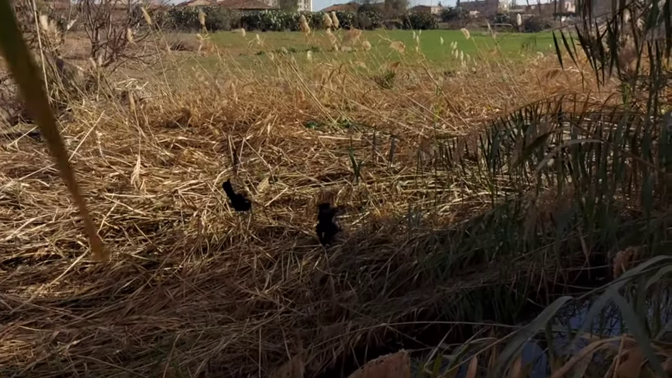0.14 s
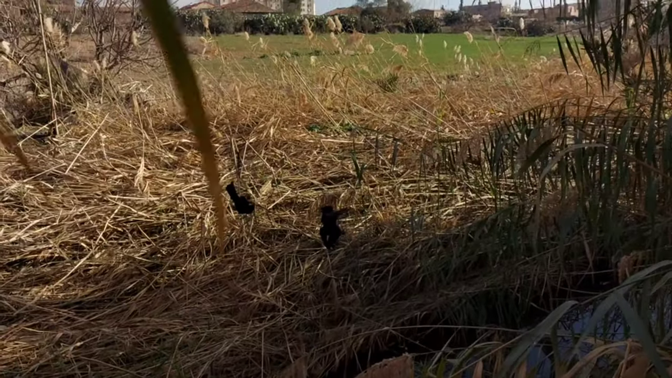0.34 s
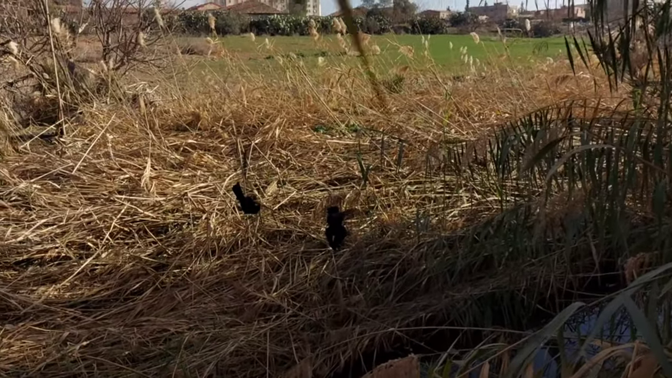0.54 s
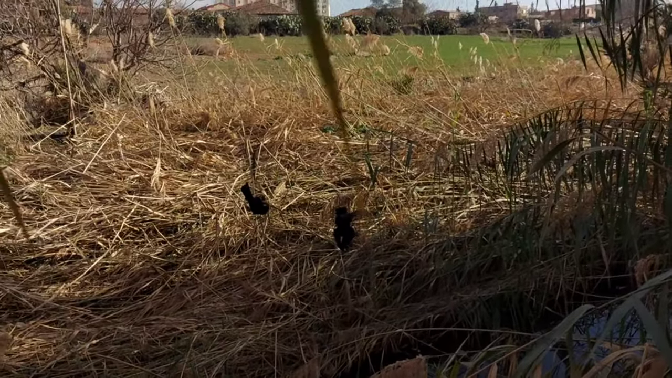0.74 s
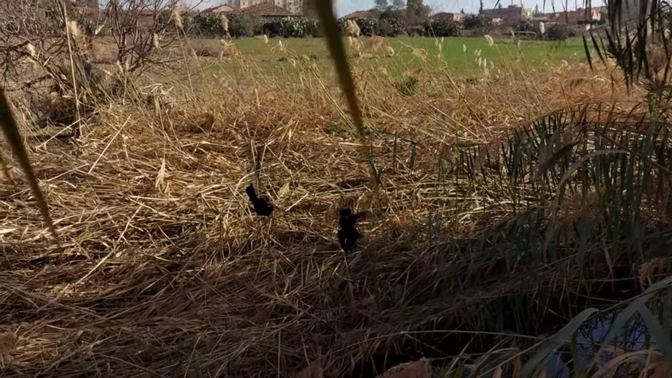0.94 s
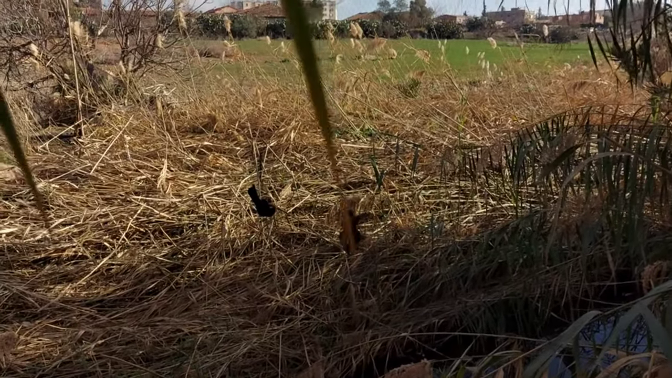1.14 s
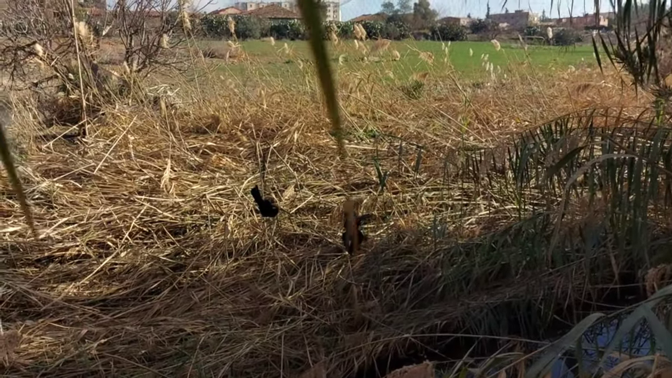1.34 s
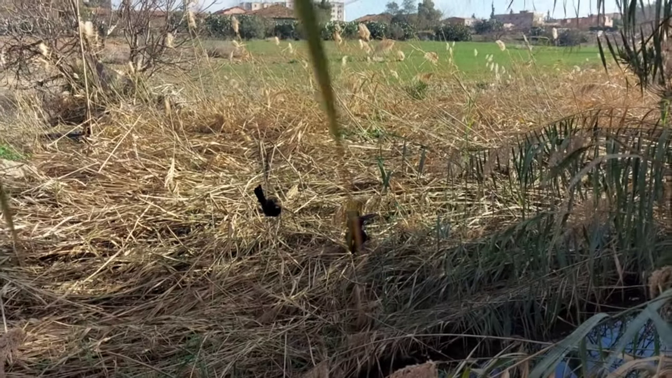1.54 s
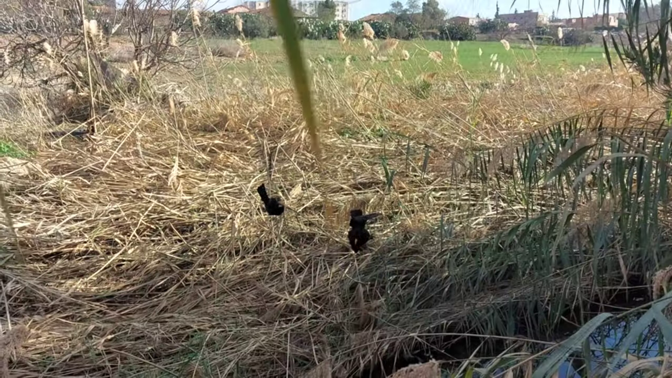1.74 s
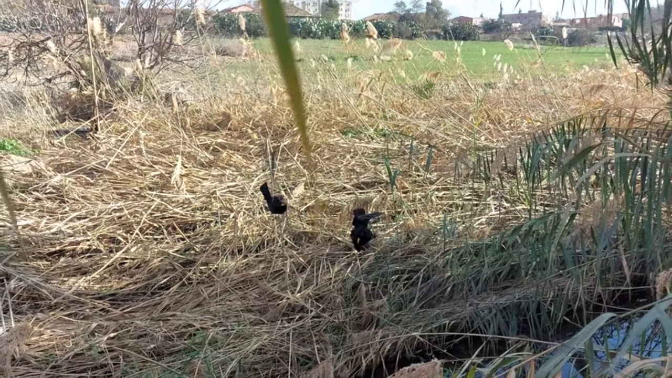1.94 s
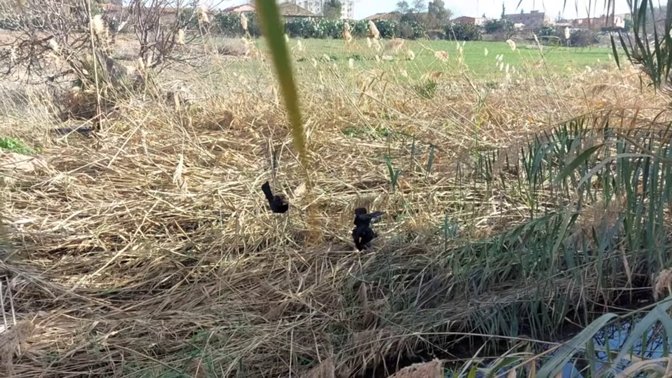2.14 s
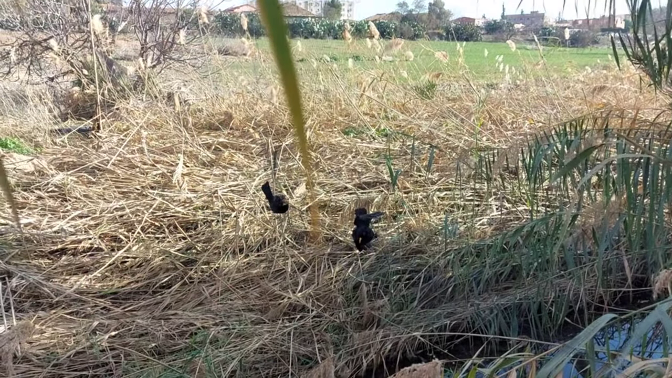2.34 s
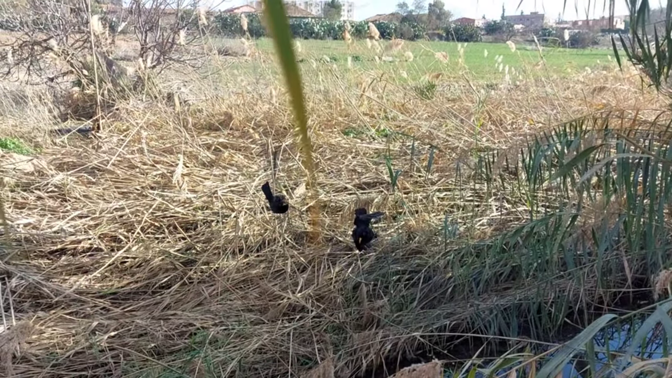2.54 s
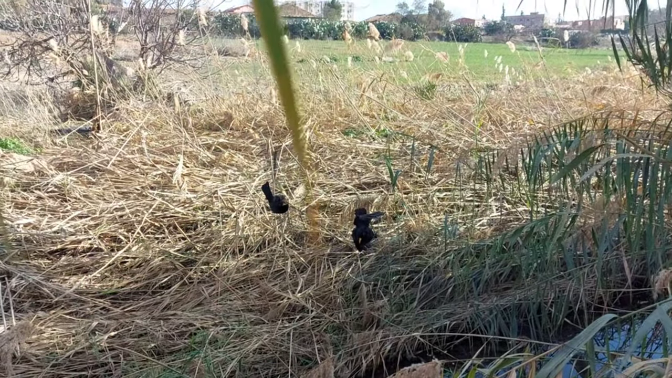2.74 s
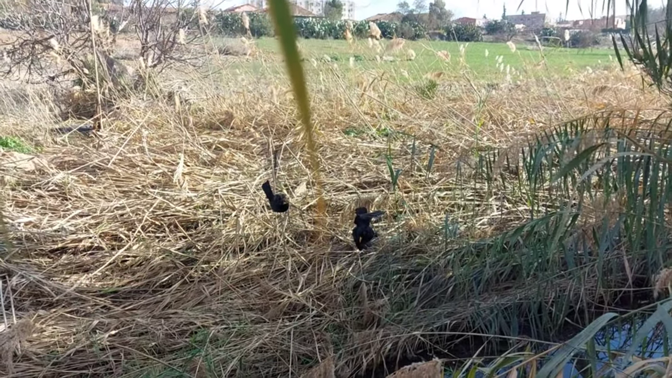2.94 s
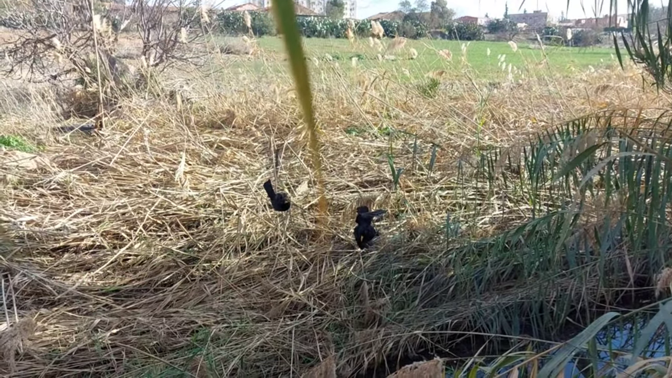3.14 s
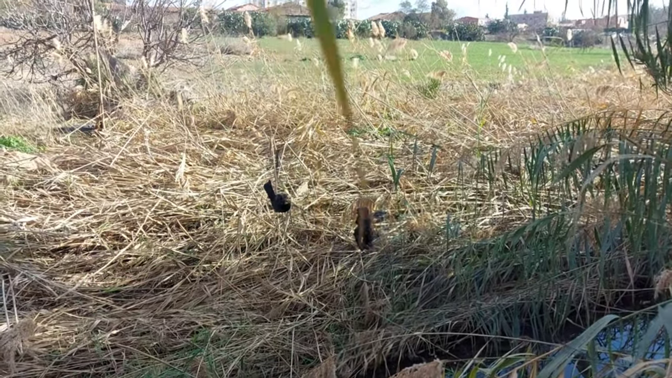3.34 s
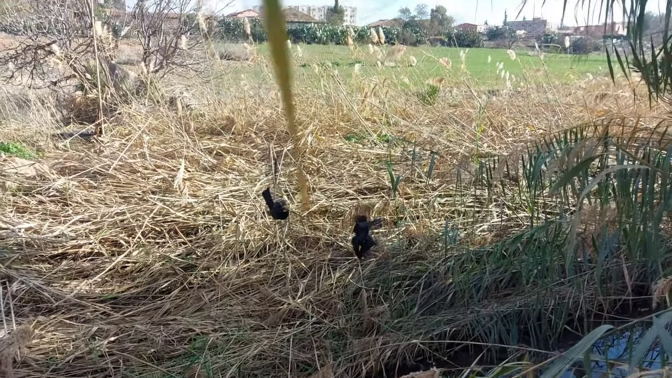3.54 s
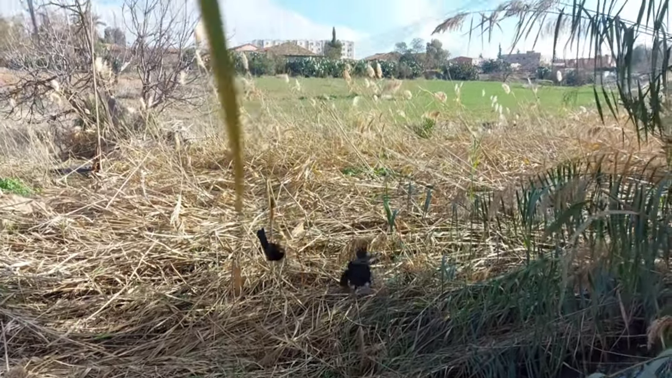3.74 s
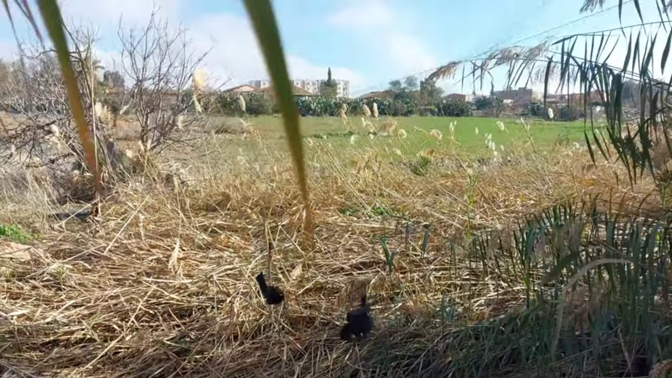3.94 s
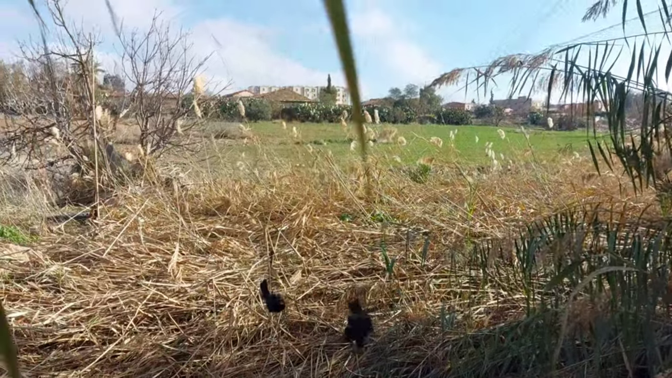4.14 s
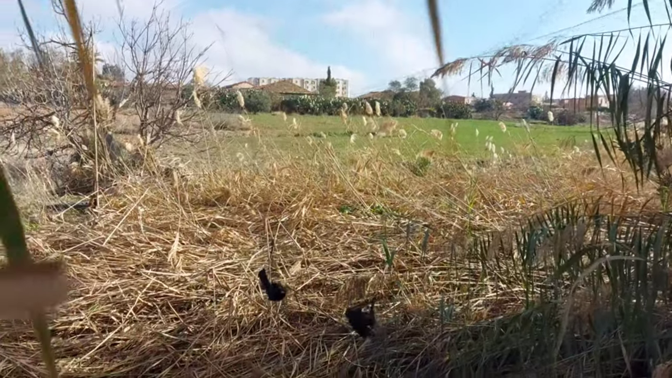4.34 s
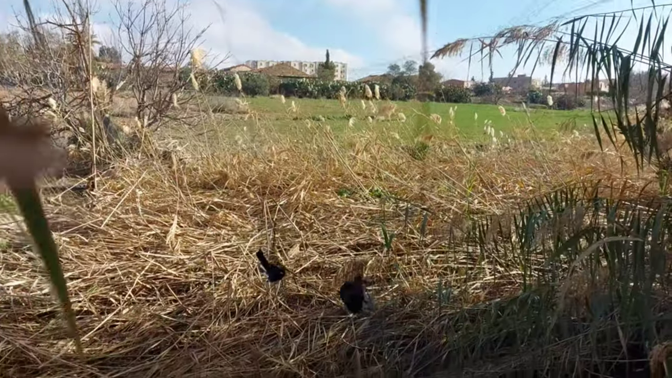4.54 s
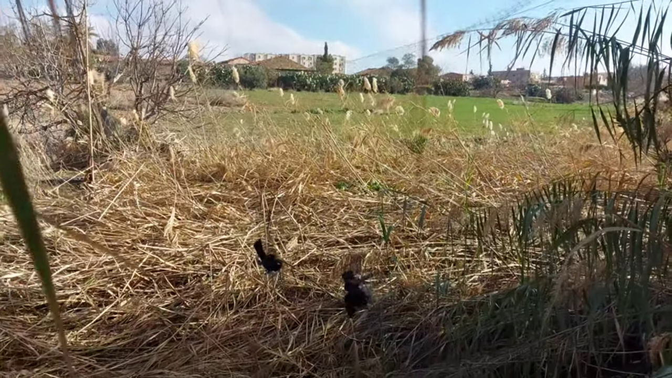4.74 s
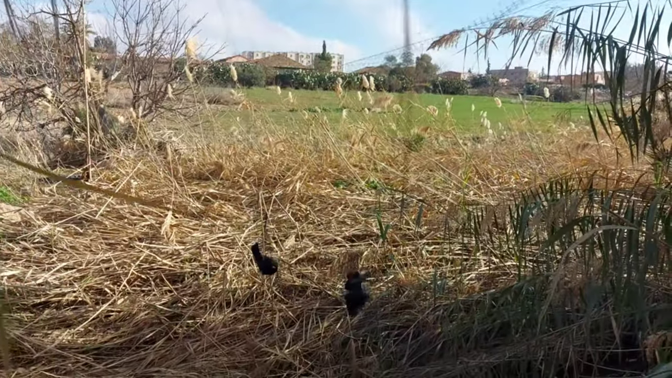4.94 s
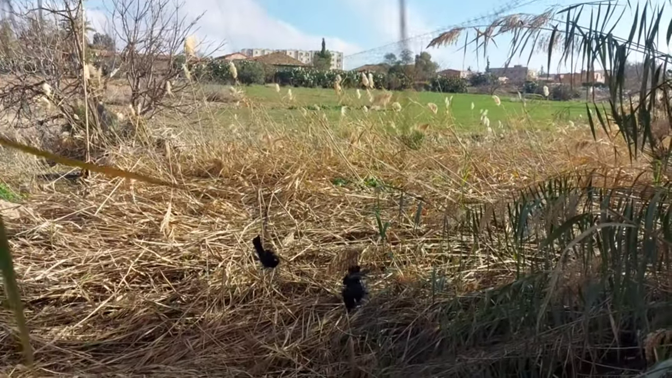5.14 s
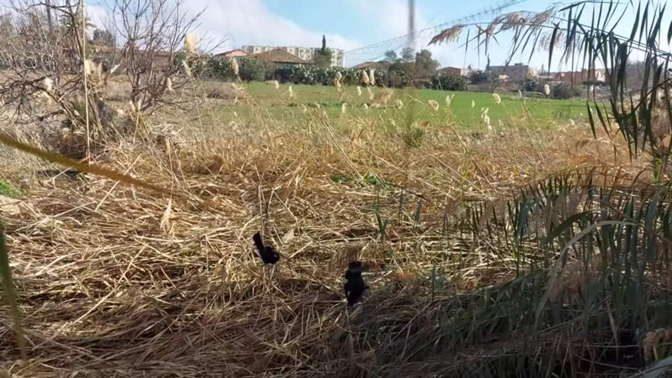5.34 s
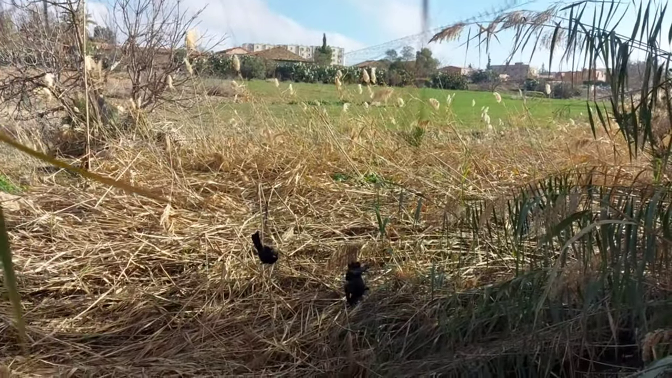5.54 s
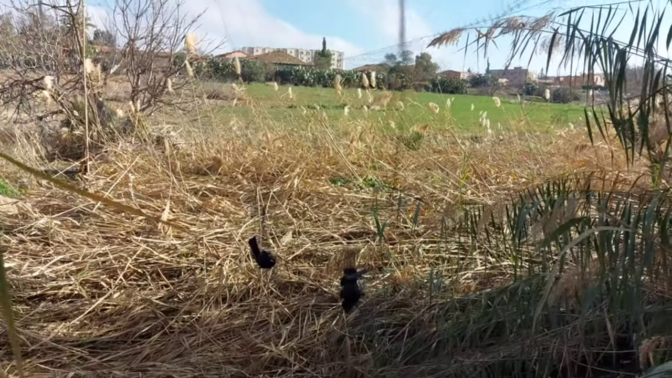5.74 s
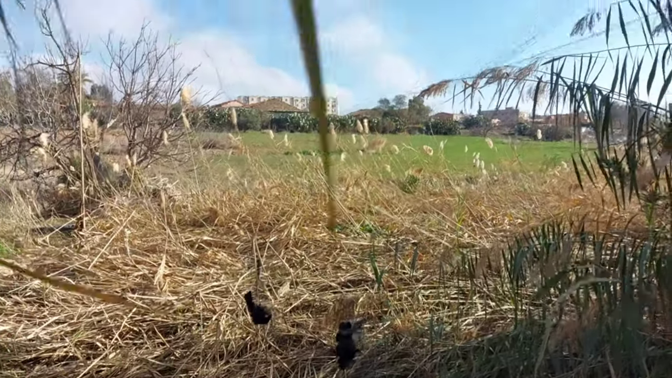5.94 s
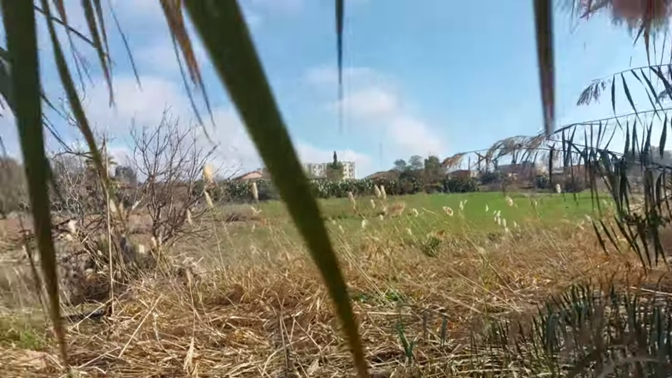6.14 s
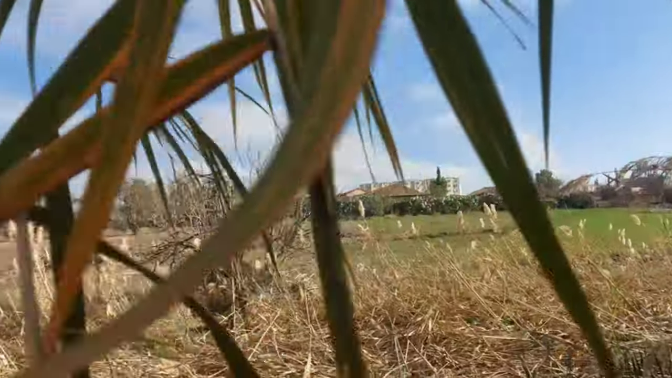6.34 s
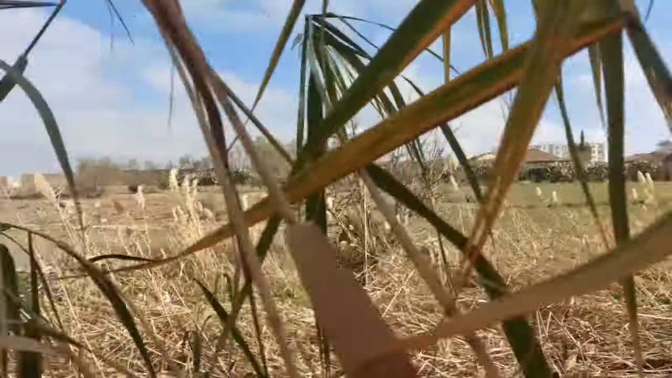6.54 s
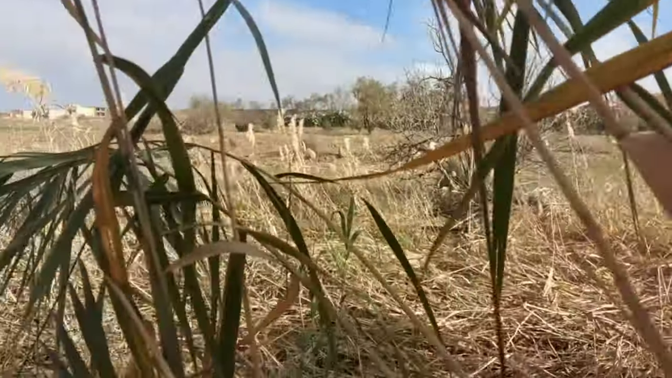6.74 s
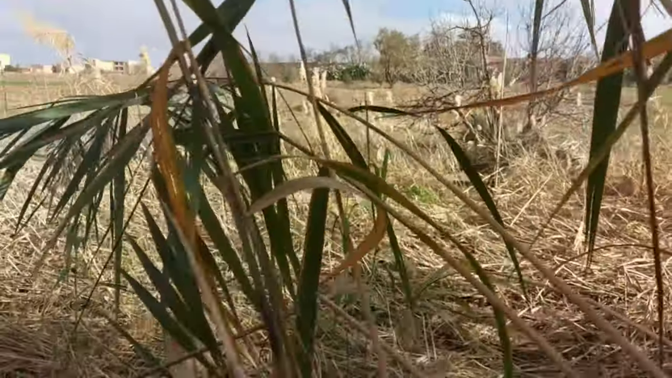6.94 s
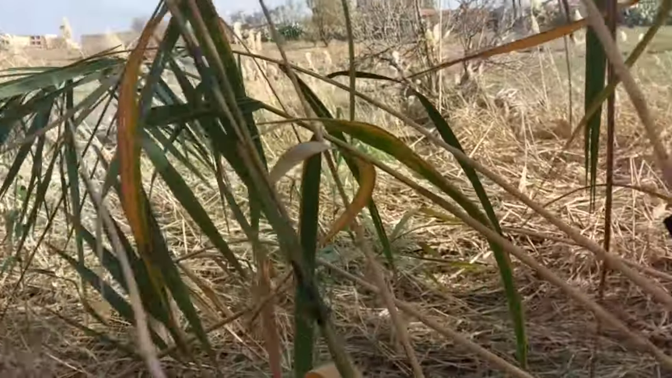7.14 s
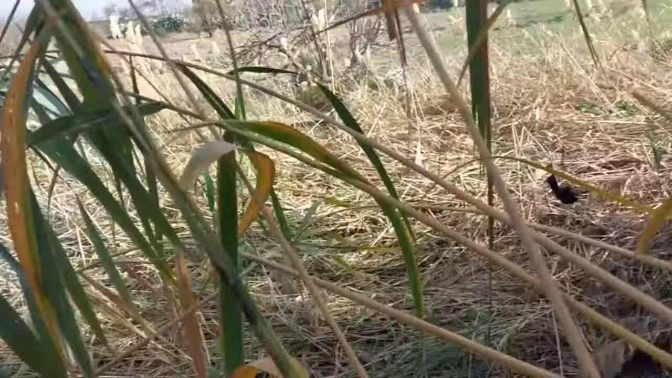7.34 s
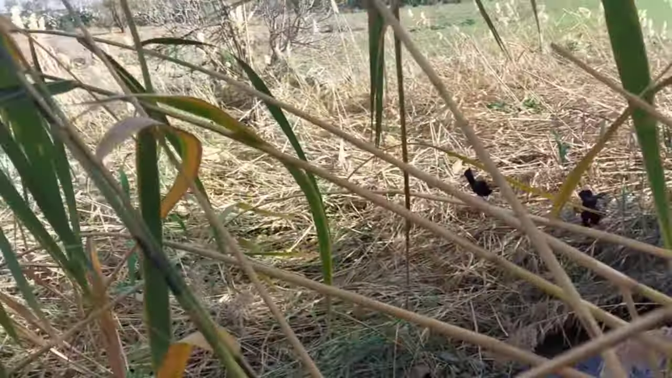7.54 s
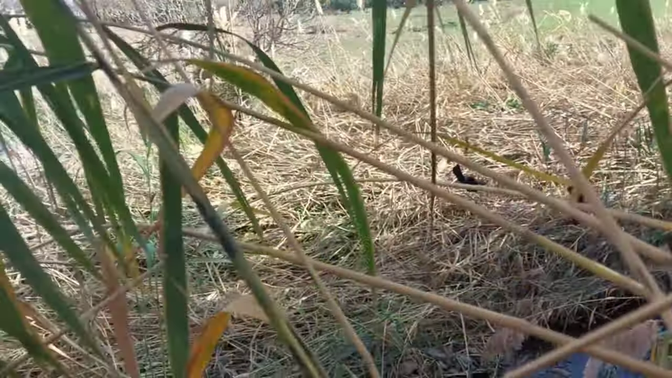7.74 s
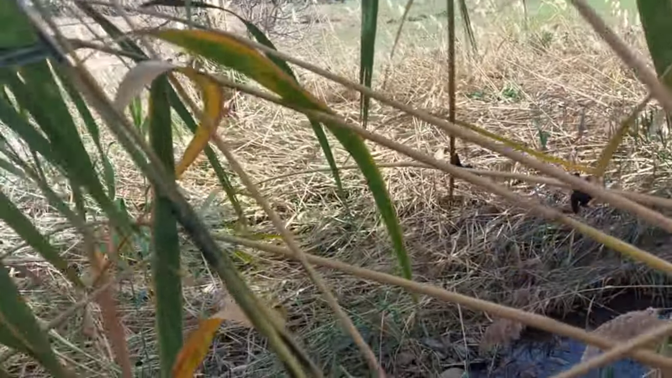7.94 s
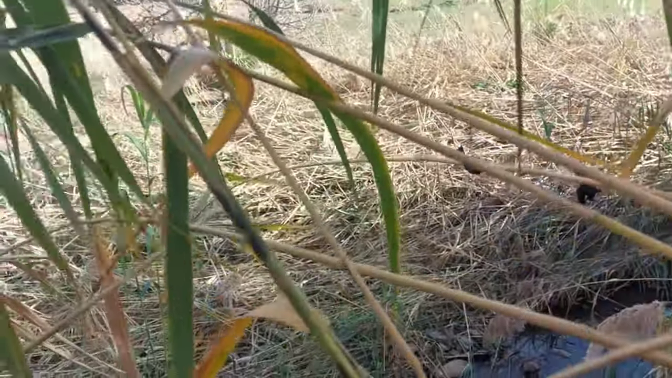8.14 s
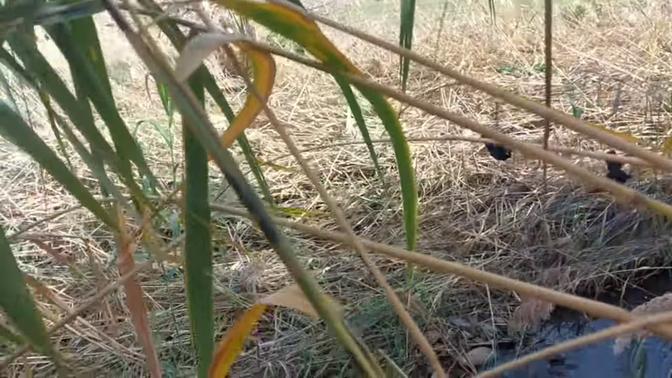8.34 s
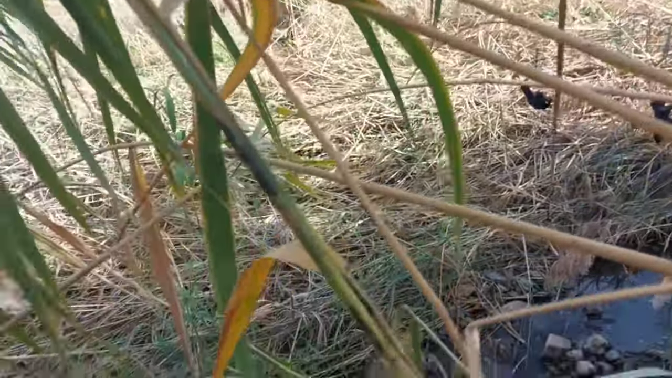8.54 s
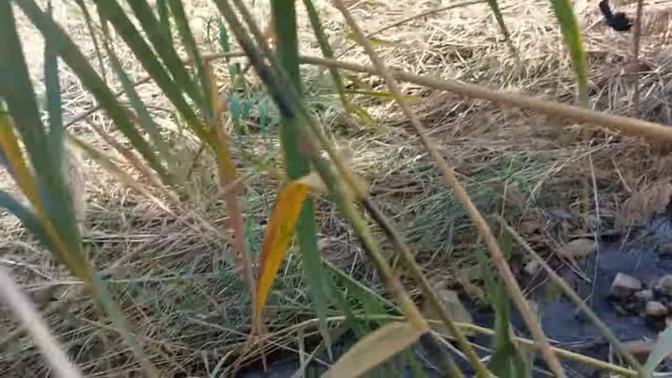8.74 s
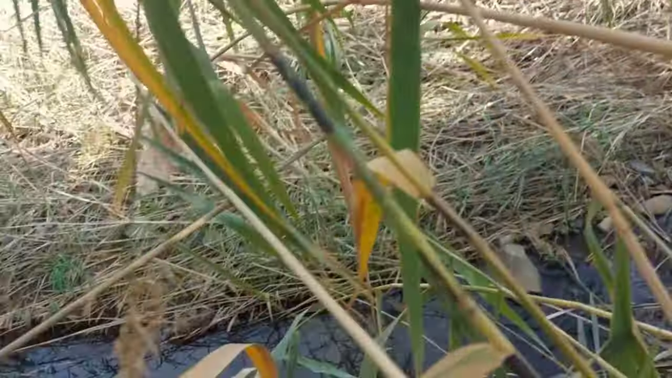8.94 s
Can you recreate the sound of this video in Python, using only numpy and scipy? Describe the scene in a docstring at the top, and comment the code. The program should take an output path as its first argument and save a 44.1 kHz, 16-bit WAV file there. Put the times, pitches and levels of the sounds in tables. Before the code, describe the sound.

Close stereo microphones among dry reeds, leaning right: a quick double wipe of leaves, sparse ticks, soft wind rumble and a low far-off drone. Small bird chirps come first, then a string of sharp chacks amid gentle rustling, with faint hoots and twitters. After a quieter spell, dense brushing surges twice, with very sharp snapping stems and a few low bumps.

```python
"""In a reed bed, wind rumbles low and a distant engine drones, slowly sinking in pitch: filtered noise, tones.
At first dry leaves wipe past the two microphones and stems snap: patchy hiss with tiny slips, cracks, pops.
Far hoots join in, blurred tones; a near bird squeaks and chirps, later chacks: gliding notes with some rasp.
A push through the leaves begins, and a farther bird twitters in warbling strands.
Last come the hardest pushes, the loudest snaps, and stems that knock the recorder: damped low swings."""
import sys
import numpy as np
from scipy import signal
from scipy.fft import rfft, irfft, next_fast_len
from scipy.io import wavfile
from scipy.ndimage import uniform_filter1d

SR = 44100
rng = np.random.default_rng(int(sys.argv[2]) if len(sys.argv) > 2 else 0)


def pcm_store(signal):
    """Save signal as 16-bit PCM."""
    levels = np.round(np.clip(np.atleast_2d(signal), -1, 1) * 32767)
    wavfile.write(sys.argv[1], SR, levels.astype(np.int16).T)


N = 400428
TIME = np.arange(N) / SR

# Low wind rumble. Each row: time in seconds, level in dB before trim and lumps.
WIND_LEVEL = [(0, -50), (.6, -54.5), (6, -54), (6.9, -49), (7.7, -57), (9.08, -60)]
# Colour of the rumble. Each row: frequency in Hz, relative level in dB.
RUMBLE_COLOUR = [(20, -24), (35, -6), (50, 4), (63, 4.5), (80, 1.5), (115, -5), (170, -14.5), (300, -26),
                 (600, -104)]
# Colour of the soft wash over open fields. Each row: frequency in Hz, relative level in dB.
WASH_COLOUR = [(100, 0.5), (320, 5.5), (480, -3.5), (1000, -1.5), (2000, -2.5), (3000, -22.5), (5000, -26),
               (15000, -32)]
# Narrow band of far-off hiss. Each row: frequency in Hz, relative level in dB.
FAR_HISS_COLOUR = [(100, -60), (1650, -16), (2100, -2), (2600, -27), (15000, -60)]
# Likeness of noise at the two microphone ports. Each row: frequency in Hz, correlation from 0 to 1.
PORT_LIKENESS = [(30, .8), (80, .85), (150, .62), (400, .55), (1000, .3), (3000, .2), (9000, .1)]
# Distant drone. Each row: time in seconds, level in dB before it wavers.
DRONE_LEVEL = [(.25, -46), (.5, -55), (.95, -54), (1.15, -44), (1.7, -43), (2, -48), (5.6, -49.5),
               (6.9, -44.5), (7.4, -55)]
DRONE_HZ, DRONE_SAG_HZ_PER_S = 74.5, 1.2  # pitch at the start, and its steady fall

# Colour the two microphone ports give to close leaf sound. Each row: frequency in Hz,
# gain at the left port in dB, at the right in dB.
PORT_COLOUR = [(119, -13, -17.5), (346, -5, -13.5), (1130, -5.5, -16), (2020, -2.5, -5.5), (4440, 1.5, -2),
               (5070, 1, -5.5), (7000, 3, -2.5), (8460, 1.5, 2), (9150, -7, -3.5), (10100, 2.5, -7.5),
               (12000, 4, 0), (15200, -1, 3)]
# Side on which the leaves slide. Each row: time in seconds, left minus right in dB.
LEAF_SIDE = [(0, -5), (4, -6.5), (6.7, -7.5), (7.6, -10), (9.08, -10)]
# Single leaves wiping past. Each row: time of the peak in seconds, level in dB before trim,
# rise in seconds, fall in seconds, blade resonance in dB.
LEAF_SWIPES = [(.17, -34.5, 0.07, 0.18, 5), (.29, -24, 0.059, 0.035, 5), (.6, -42.5, 0.12, 0.18, 0.5),
               (.72, -45.5, 0.12, 0.049, 2.5), (1.24, -56.5, 0.11, 0.33, -1), (4.9, -53, 0.03, 0.12, 5),
               (5.19, -55.5, 0.23, 0.23, -1.5), (5.61, -54, 0.073, 0.14, -5),
               (6.15, -49.5, .08, 0.23, -1.5), (6.29, -46.5, .07, .1, -3.5)]
SWIPE_DROP_DB, SWIPE_ROUND = 11.5, 1.38  # drop over one rise or fall time; roundness of the peak
# Leaves stirring between the pushes. Each row: time in seconds, level in dB before trim.
LEAF_STIR = [(0, -52), (1.9, -64.5), (2.4, -71), (3.05, -72), (4.8, -61), (5.4, -68), (6, -68)]
# Long pushes through the leaves, one curve each. Each row: time in seconds, level in dB before trim.
LEAF_PUSHES = [
    [(3.2, -63), (3.288, -57), (3.774, -44), (4.072, -41.5), (4.488, -47.5), (4.736, -52.5), (4.8, -61.5)],
    [(6.3, -48), (7.01, -29.5), (7.27, -29), (7.69, -35.5), (7.94, -33.5), (8.14, -37), (8.3, -45.5)],
    [(8.3, -40.5), (8.46, -41), (8.64, -29.5), (8.76, -27), (8.81, -25), (8.93, -30), (9.08, -36.5)],
]
RELEASE_DB_PER_S = 250  # how fast the leaves settle outside a push
HARD_DB, DULL_DB_PER_OCTAVE_PER_DB = -25.5, 0.0762  # brushing softer than this sounds ever duller
SLIPS_PER_S, GRAIN_DB, FLUTTER_DB = 1400, -4, 1.4  # slip rate, slips over the hiss, flutter of both
TICKS_PER_S, TICK_SHIVER, TICK_SHIVER_S = 20, .4, .018  # leaf-tip rate; strength and decay of the shiver
# Loudest stems snapping. Each row: start in seconds, crisp crack in dB and woody pop in dB,
# both before trim, left minus right in dB (halved for the pop).
STEM_SNAPS = [(0.1892, -22, -38, 5), (0.2684, -19, -27, 7), (0.2802, -21, -35, 6), (0.6915, -24, -54, -5),
              (0.7367, -25, -49, -10), (1.192, -46, -57, -5), (1.2082, -38, -60, 4),
              (1.2508, -36, -56, 0.0), (1.9669, -41, -67, -4.0), (2.0737, -40, -47.5, -4.0),
              (2.438, -38.5, -67, -10), (2.799, -32.5, -79, -8.5), (2.8892, -37.5, -73, -12),
              (2.9572, -42, -72, -10), (3.1093, -34.5, -78, -2), (3.1334, -33, -73, -3),
              (4.8855, -27.5, -71, -4), (5.1736, -30.5, -73, -3), (5.4705, -35.5, -78, -2),
              (5.5246, -37, -66, -0.5), (5.5606, -32.5, -74, -1.0), (5.5998, -30, -60, 6),
              (6.112, -25.5, -67, -10), (7.286, -9, -30, -3.5), (7.4395, -13, -24.5, -10),
              (7.8638, -8, -33.5, -9), (7.874, -9, -34, -12), (7.9256, -7.5, -26, -9),
              (8.657, -13, -27, -11.0), (8.7287, -16, -24.5, -6.5), (8.8818, -6, -24, -6)]

# Faint hoots across the fields. Each row: start in seconds, length in seconds, pitch in Hz, level in dB.
FAR_HOOTS = [(0.43, 0.13, 517, -61.5), (2.225, 0.17, 774, -65.5), (4.398, 0.21, 540, -61),
             (5.03, 0.097, 555, -60)]
# The near bird's rasping squeaks, which flick upwards. Each row: start in seconds, length in seconds,
# pitch at the turn in Hz, level in dB.
BIRD_SQUEAKS = [(1.469, .036, 2300, -48), (4.454, 0.023, 1500, -40), (4.621, .03, 1400, -40)]
# share of the note before the turn; start and end as shares of the turn pitch; rasp at FULL_CHACK_DB
SQUEAK_TURN, SQUEAK_START, SQUEAK_END, SQUEAK_RASP = .54, .88, 1.72, .98
# Its clear chirps. Each row: start in seconds, length in seconds, start pitch in Hz, turn pitch in Hz,
# end pitch in Hz, level in dB.
BIRD_CHIRPS = [(1.819, 0.053, 3030, 2540, 2880, -43), (2.039, 0.043, 1870, 2360, 2670, -43.5),
               (2.133, 0.08, 3350, 3140, 2940, -52.5), (2.16, 0.0265, 2850, 2550, 2200, -53),
               (2.236, 0.043, 2750, 2860, 2900, -48), (2.279, 0.045, 2840, 2610, 2140, -41.5)]
CHIRP_TURN, CHIRP_RASP = .42, .04  # share of the note before the turn; rasp from 0 to 1
# Its chacks, which shoot up and slide down. Each row: start in seconds, length in seconds,
# top pitch in Hz, level in dB.
BIRD_CHACKS = [(3.688, 0.023, 2880, -46), (3.783, 0.03, 2150, -38.5), (3.913, 0.029, 2470, -34),
               (4.059, .023, 2530, -34.5), (4.181, .031, 2490, -35), (4.343, 0.032, 2764, -32.5),
               (4.586, 0.011, 2150, -45.5)]
# as for a squeak, with start and end as shares of the top pitch
CHACK_TURN, CHACK_START, CHACK_END, CHACK_RASP = .24, .62, .48, .48
FULL_CHACK_DB, RASP_PER_DB = -34.5, .09  # softer calls are cleaner
# The far bird's twitters. Each row: start in seconds, length in seconds, pitch in Hz, level in dB,
# warble as a share of the pitch.
FAR_TWITTERS = [(3.256, 0.1, 5270, -58, .06), (4.959, 0.15, 4150, -52, .15), (5.66, .09, 4700, -58.5, .08),
                (5.729, .085, 3400, -63.5, .05)]
# Stems knocking the recorder. Each row: start in seconds, level in dB, pitch in Hz,
# time to fall by 60 dB in seconds.
STEM_BUMPS = [(7.44, -22, 71, 0.065), (8.193, -39, 251, 0.13), (8.882, -34, 346, 0.066)]


def gain_of(db):
    """Decibels to a factor."""
    return 10 ** (np.asarray(db) / 20)


def evened(x):
    """Scales to rms 1."""
    return x / np.sqrt(np.mean(x ** 2) + 1e-20)


def read(points, hz, axis=1):
    """One column of a spectrum table, on a log-frequency axis."""
    table = np.transpose(points)
    return np.interp(np.log(hz + 1), np.log(table[0] + 1), table[axis])


def follow(rows, t):
    """The columns of a curve table at the times t."""
    s, *columns = np.transpose(rows)
    return [np.interp(t, s, c) for c in columns]


def add(mix, s, sound):
    """Lays a two-channel sound into the mix at time s."""
    part = mix[:, max(round(s * SR), 0):][:, :sound.shape[1]]
    part += sound[:, :part.shape[1]]


def sides(pan_db):
    """Left and right gains of constant power."""
    ratio = gain_of(pan_db)
    return np.array([ratio, np.ones_like(ratio)]) * np.sqrt(2 / (1 + ratio ** 2))


def wander(rate_hz, count):
    """Smooth random drift, near rms 1, slower than about rate_hz."""
    hz = np.fft.rfftfreq(next_fast_len(count + SR), 1 / SR)
    noise = rfft(rng.standard_normal(2 * len(hz) - 2))
    return evened(irfft(noise / (1 + (hz / rate_hz) ** 4)))[:count]


def paired(z, hz):
    """Two unrelated spectra become a port pair: alike in the bass, apart in the treble."""
    same = np.clip(read(PORT_LIKENESS, hz), -1, 1)
    return np.array([z[0], same * z[0] + np.sqrt(1 - same ** 2) * z[1]])


def air(spectrum, lag_s=0.00032):
    """Steady noise of a given colour that reaches the left port first."""
    hz = np.fft.rfftfreq(N, 1 / SR)
    lag = np.exp(-2j * np.pi * np.outer([0, lag_s], hz))
    z = paired(rfft(rng.standard_normal((2, N))), hz) * lag
    return evened(irfft(z * gain_of(read(spectrum, hz)), N))


def wind(rumble_db=4.0, wash_db=-60.0, gust_db=1, lump_db=0.4, hiss_db=-69):
    """Lumpy low rumble under the soft wash of the open fields and a faint band of hiss."""
    rumble_level = follow(WIND_LEVEL, TIME)[0] + rumble_db + lump_db * wander(12, N)
    rumble = air(RUMBLE_COLOUR) * gain_of(rumble_level)
    wash = air(WASH_COLOUR) * gain_of(wash_db + gust_db * wander(2.5, N))
    hiss = air(FAR_HISS_COLOUR) * gain_of(hiss_db)
    return (rumble + wash + hiss) * sides(-1.5)[:, None]


def drone(level_db=0, octave_db=-22, waver_db=3.5):
    """A far engine off to the left, slowing steadily, fading and swelling with the air between."""
    hz = DRONE_HZ - DRONE_SAG_HZ_PER_S * TIME
    port_phase = np.array([[0], [.5]])  # radians by which the right port lags
    phase = 2 * np.pi * np.cumsum(hz + 2 * wander(2.88, N)) / SR - port_phase
    tone = np.sqrt(2) * (np.sin(phase) + gain_of(octave_db) * np.sin(2 * phase))
    loudness_db = follow(DRONE_LEVEL, TIME)[0] + level_db + waver_db * wander(5.5, N)
    return tone * gain_of(loudness_db) * sides(-1.5)[:, None]


def port_colour(hz):
    """Colour the two microphone ports give to close leaf sound, as gains."""
    return gain_of([read(PORT_COLOUR, hz, axis=1), read(PORT_COLOUR, hz, axis=2)])


def swipe_force():
    """Level in dB of the single leaves: each swells to a rounded peak and dies away."""
    power = 1e-12
    for s, db, rise_s, fall_s, _ in LEAF_SWIPES:
        away = np.maximum((s - TIME) / rise_s, (TIME - s) / fall_s)
        drop_db = SWIPE_DROP_DB * np.minimum(abs(away), 10) ** SWIPE_ROUND
        power = power + gain_of(db - drop_db) ** 2
    return 10 * np.log10(power)


def push_force():
    """Level in dB of the long pushes, never below the stirring of the leaves."""
    force_db = follow(LEAF_STIR, TIME)[0]
    for push in LEAF_PUSHES:
        outside_s = abs(TIME - np.clip(TIME, push[0][0], push[-1][0]))
        force_db = np.maximum(force_db, follow(push, TIME)[0] - RELEASE_DB_PER_S * outside_s)
    return force_db


def rustle(force_db, level_db, blade_db, blade_hz, patchy_db=2.0, pivot_hz=9000):
    """Ribbed leaves slide: fine hiss and tiny slips, patchy in colour, brighter when pressed harder."""
    size = gain_of(3 * np.minimum(rng.exponential(1, N), 4))
    slips = size * (rng.random(N) < SLIPS_PER_S / SR)
    scratch = np.exp(-np.arange(200) / SR / 0.00051)  # each slip decays in about half a millisecond
    grains = evened(signal.oaconvolve(slips, scratch)[:N])
    drive = rng.standard_normal((2, N)) * evened(np.hypot(1, gain_of(GRAIN_DB) * grains))
    drive *= gain_of(FLUTTER_DB * wander(20.5, N))
    _, t, z = signal.stft(drive, SR, nperseg=512, noverlap=384)
    hz = np.fft.rfftfreq(512, 1 / SR)[:, None]
    # colour patches, smoothed over frequency and time, as one blade after another touches
    patches = uniform_filter1d(rng.standard_normal(z.shape), 7, 1)
    patches = evened(uniform_filter1d(patches, 14, 2))
    softness_db = np.minimum(np.interp(t, TIME, force_db) - HARD_DB, 0)
    tilt_db = DULL_DB_PER_OCTAVE_PER_DB * softness_db * np.log2(np.maximum(hz, 400) / pivot_hz)
    resonance = np.exp(-np.log2((hz + 1) / blade_hz) ** 2)  # broad resonance of the blades
    tilt_db += np.interp(t, TIME, blade_db * np.ones(N)) * resonance
    z = paired(z, hz) * port_colour(hz) * gain_of(patchy_db * patches + tilt_db)
    z = z * sides(follow(LEAF_SIDE, t)[0])[:, None]
    sliding = signal.istft(z, nperseg=512, noverlap=384)[1][:, :N]
    return sliding * gain_of(force_db + level_db)


def ticks(force_db, level_db=-5, spread_db=11.0, crack_s=0.0006, rest_db=-60):
    """Dry leaf tips flick at random, even while the reeds are nearly still."""
    t = np.arange(3000) / SR
    size = gain_of(spread_db * np.minimum(rng.exponential(1, N), 3))
    flicks = size * (rng.random(N) < TICKS_PER_S / SR)
    decay = np.exp(-t / crack_s) + TICK_SHIVER * np.exp(-t / TICK_SHIVER_S)
    fall = signal.oaconvolve(flicks, decay)[:N]
    hz = np.fft.rfftfreq(N, 1 / SR)
    thin = hz / np.hypot(hz, 3500)  # little bass
    sound = irfft(rfft(fall * rng.standard_normal((2, N))) * port_colour(hz) * thin, N)
    # heavy brushing damps the flicks: they grow less than the force
    return evened(sound) * gain_of(level_db + rest_db + 0.75 * (force_db - rest_db))


def snaps(crisp_db=-5, crack_s=0.0025, shiver_db=-15, shiver_s=0.043,
          pop_db=2.5, pop_hz=2300, pop_s=0.00051, ring_db=3):
    """A stem gives way with a sharp crack and its leaf shivers; a thick hollow stem also pops."""
    out, t = np.zeros((2, N)), np.arange(4096) / SR
    hz = np.fft.rfftfreq(len(t), 1 / SR)
    lead = 64  # samples of room ahead of the crack
    stem = signal.butter(2, [1000, 4500], "band", fs=SR, output="sos")
    fall = np.exp(-t / crack_s) + gain_of(shiver_db) * np.exp(-t / shiver_s)
    thin = hz / np.hypot(hz, 2500)  # a thin blade radiates little bass
    for s, crack_db, woody_db, pan_db in STEM_SNAPS:
        noise = rng.standard_normal((2, len(t)))
        # each leaf has its own resonances
        rings = evened(uniform_filter1d(rng.standard_normal(len(hz)), size=70))
        colour = port_colour(hz) * thin * gain_of(ring_db * rings)
        crack = irfft(rfft(np.roll(noise * fall, lead, axis=1)) * colour)
        crack /= np.sqrt(np.mean(crack[:, lead:2 * lead] ** 2))  # level set by the onset
        swing = np.sin(2 * np.pi * pop_hz * rng.uniform(1.0, 1.04) * t) * np.exp(-t / pop_s)
        pop = signal.sosfilt(stem, swing + noise * fall)
        pop /= np.sqrt(np.mean(pop[:, :lead] ** 2))
        add(out, s - lead / SR, crack * gain_of(crack_db + crisp_db) * sides(pan_db)[:, None])
        add(out, s, pop * gain_of(woody_db + pop_db) * sides(pan_db / 2)[:, None])
    return out


def hoots(width_hz=50):
    """Distant calls, blurred into narrow hollow tones."""
    out = np.zeros((2, N))
    for s, length, hz, db in FAR_HOOTS:
        t = np.arange(0, length, 1 / SR)
        blur = wander(width_hz, len(t)) + 1j * wander(width_hz, len(t))
        tone = (blur * np.exp(2j * np.pi * hz * t)).real * signal.windows.tukey(len(t), .7)
        add(out, s, gain_of(db) * evened(tone) * np.ones((2, 1)))
    return out


def thicket(x, t60=0.21, wet_db=-10, count=7):
    """Ground and near stems throw back single echoes; the rest of the reed bed scatters a diffuse tail."""
    t = np.arange(SR // 2) / SR
    taps = rng.standard_normal((2, len(t))) * (rng.random((2, len(t))) < .06)
    taps *= (t > .008) * gain_of(-60 * t / t60)
    taps *= gain_of(wet_db) / np.linalg.norm(taps, axis=1, keepdims=True)
    for port in taps:
        echoes = (rng.uniform(.003, .024, count) * SR).astype(int)
        port[echoes] += .18 * rng.choice([-1, 1], count)
    return x + signal.fftconvolve(x, taps, axes=1)[:, :N]


def from_the_left(x, lead_rad=1.15, full_hz=2000):
    """The left port leads the right in phase, more so with rising pitch up to full_hz."""
    hz = np.fft.rfftfreq(N, 1 / SR)
    return irfft(rfft(x) * np.exp(-1j * np.outer([0, lead_rad], np.minimum(hz / full_hz, 1))), N)


def rasp_at(db, full_rasp):
    """The louder the call, the harsher."""
    return np.clip(full_rasp + RASP_PER_DB * (db - FULL_CHACK_DB), .25, 1)


def note(length_s, turn, start_hz, turn_hz, end_hz, rasp,
         overtone_db=-1, step_db=-5, hiss_db=-4, settle=1.9):
    """A note glides to a turning point and away; raspy notes flutter and gain overtones and hiss."""
    beak = signal.butter(3, [1900, 6000], "band", fs=SR, output="sos")
    t, before = np.arange(0, length_s, 1 / SR), length_s * np.clip(turn, .05, .95)
    approach = np.minimum(t / before, 1)
    leave = np.clip((t - before) / (length_s - before), 0, 1)
    hz = start_hz + (turn_hz - start_hz) * approach ** 1.564
    hz = hz + (end_hz - turn_hz) * (1 - (1 - leave) ** settle)
    waver = (.018 + .06 * rasp) * wander(300, len(t))
    flutter = 1 + (.25 + .6 * rasp) * wander(400, len(t))
    phase = 2 * np.pi * np.cumsum(hz * (1 + waver)) / SR
    overtones = sum(gain_of(overtone_db + step_db * k) * np.sin((k + 2) * phase) for k in range(3))
    hiss = gain_of(hiss_db) * evened(signal.sosfilt(beak, rng.standard_normal(len(t))))
    harsh = 2 * rasp ** 2 * (signal.sosfilt(beak, overtones) + hiss)
    swell = np.interp(t, [0, before, length_s], [.5, 1, .25]) * signal.windows.tukey(len(t), .15)
    return evened(swell * flutter * (np.sin(phase) + harsh))


def birds(level_db=0, pan_db=-1):
    """The near bird squeaks, chirps and chacks; each kind of call has its own turning point and rasp."""
    out, place = np.zeros((2, N)), gain_of(level_db) * sides(pan_db)[:, None]
    for s, length, hz, db in BIRD_SQUEAKS:
        rasp = rasp_at(db, SQUEAK_RASP)
        squeak = note(length, SQUEAK_TURN, SQUEAK_START * hz, hz, SQUEAK_END * hz, rasp)
        add(out, s, place * gain_of(db) * squeak)
    for s, length, start_hz, turn_hz, end_hz, db in BIRD_CHIRPS:
        chirp = note(length, CHIRP_TURN, start_hz, turn_hz, end_hz, CHIRP_RASP)
        add(out, s, place * gain_of(db) * chirp)
    for s, length, hz, db in BIRD_CHACKS:
        rasp = rasp_at(db, CHACK_RASP)
        chack = note(length, CHACK_TURN, CHACK_START * hz, hz, CHACK_END * hz, rasp)
        add(out, s, place * gain_of(db) * chack)
    return out


def twitters(warble_hz=22, jitter=.03, sag=.07, flutter=.4, count=2):
    """The far bird warbles quickly in interweaving strands that sink a little in pitch."""
    out = np.zeros((2, N))
    for s, length, hz, db, depth in FAR_TWITTERS:
        t, song = np.arange(0, length, 1 / SR), 0
        for _ in range(count):
            warble = depth * np.sin(2 * np.pi * (warble_hz * t + rng.random()))
            warble = warble + jitter * wander(270, len(t))
            pitch = hz * (1 + warble - sag * (t / length - .5))
            strand = np.sin(2 * np.pi * np.cumsum(pitch) / SR)
            song = song + (1 + flutter * wander(400, len(t))) * strand
        song = evened(song * signal.windows.tukey(len(t), .5))
        add(out, s, gain_of(db) * song * np.ones((2, 1)))
    return out


def bumps(scuff=0.63, upper_db=-9, upper_ratio=1.9):
    """A stem knocks the recorder: two damped low swings with some scuffing, alike at both ports."""
    out, t = np.zeros((2, N)), np.arange(8000) / SR
    for s, db, hz, t60 in STEM_BUMPS:
        phase = 2 * np.pi * hz * t
        swing = np.sin(phase) + gain_of(upper_db) * np.sin(upper_ratio * phase)
        swing = swing + scuff * wander(450, len(t))
        add(out, s, -gain_of(db - 60 * t / t60) * swing * np.ones((2, 1)))
    return out


def scene():
    """Reeds close by, birds and hoots through the thicket, wind and drone behind."""
    swipe_db, push_db = swipe_force(), push_force()
    blade_db = follow(LEAF_SWIPES, TIME)[-1]
    swipes = rustle(swipe_db, level_db=4, blade_db=blade_db, blade_hz=4850)
    pushes = rustle(push_db, level_db=6.0, blade_db=-1.0, blade_hz=2200)
    reeds = swipes + pushes + ticks(np.maximum(swipe_db, push_db)) + snaps() + bumps()
    calls = from_the_left(birds() + twitters()) + hoots()
    return wind() + drone() + reeds + thicket(calls)


def record(dry):
    """The recorder's band limit: a steep low-pass at 15.9 kHz."""
    lowpass = signal.firwin(511, 15900, window=("kaiser", 9), fs=SR)
    return signal.oaconvolve(dry, lowpass[None], "same")


dry = scene()
out = record(dry)
pcm_store(out)
```